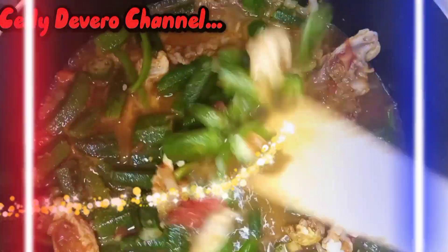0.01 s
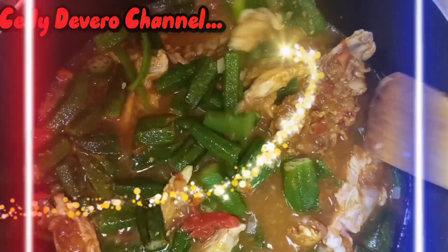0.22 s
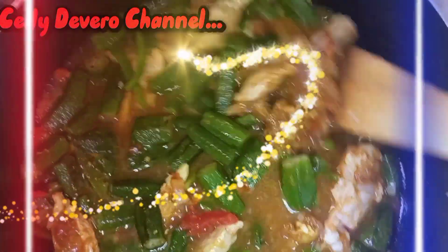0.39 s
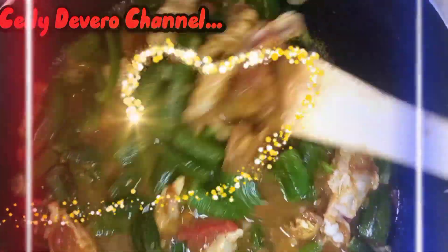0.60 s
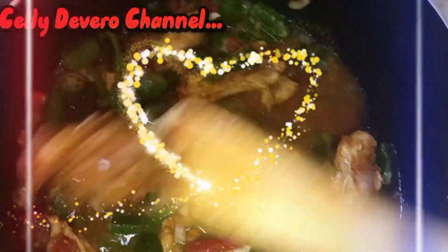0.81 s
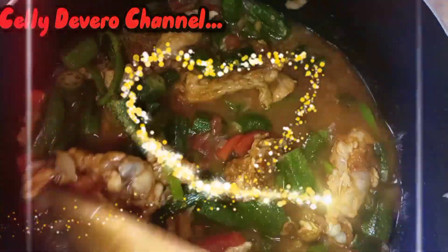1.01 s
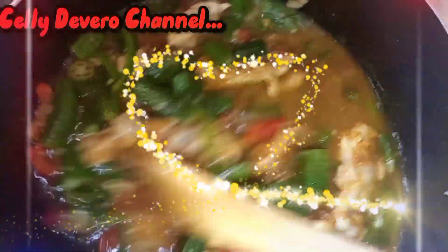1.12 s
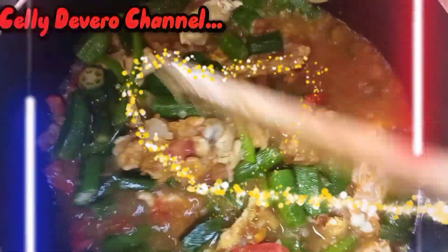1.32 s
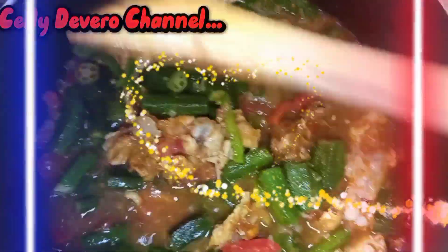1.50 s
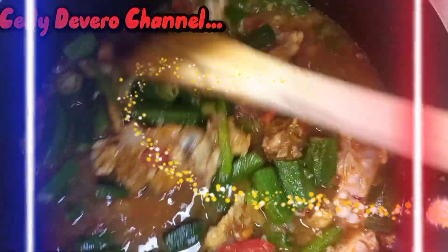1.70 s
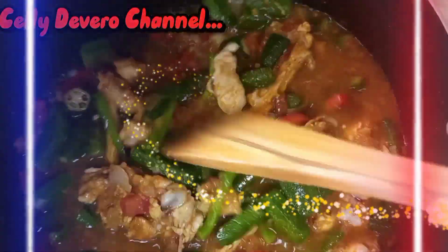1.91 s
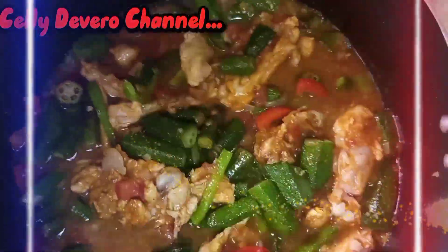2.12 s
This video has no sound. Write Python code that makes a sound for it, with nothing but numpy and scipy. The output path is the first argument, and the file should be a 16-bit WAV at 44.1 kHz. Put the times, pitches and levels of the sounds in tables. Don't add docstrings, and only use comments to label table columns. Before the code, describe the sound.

A wooden spatula knocks a metal pot of stew: a crisp clack at 0.2 seconds, a louder, hollow, damped knock at 0.28, and a faint tap near 0.66. Slight wet scrapes surround them. Quiet steam hiss, fizz and low gulps run throughout, strongest after 0.34, easing past 1 second. Bubbles tick sharply at 1.0 and 1.75. Faint motor hum, short room reflections, close dull phone microphone.

```python
import sys
import numpy as np
from scipy import signal
from scipy.fft import rfft, irfft, next_fast_len
from scipy.io import wavfile
from scipy.ndimage import uniform_filter1d, map_coordinates

SR = 44100
rng = np.random.default_rng(int(sys.argv[2]) if len(sys.argv) > 2 else 0)


def dump(signal):
    limited = np.clip(np.atleast_2d(signal).T, -1, 1)
    pcm = np.round(limited * 32767).astype(np.int16)
    wavfile.write(sys.argv[1], SR, pcm)


def volts_from_db(level):
    exponent = np.asarray(level, float) / 20
    return 10 ** exponent


N = 97020


def unit(x):
    return x / np.sqrt(np.mean(x ** 2) + 1e-20)


def along(points, hz):
    f, value = np.transpose(points)
    return np.interp(np.log(hz + 1), np.log(f + 1), value)


def wobble(rate):
    return map_coordinates(rng.standard_normal(200), [np.arange(N) * rate / SR])


def filtered(x, response):
    m = next_fast_len(len(x) + 8192)
    return irfft(rfft(x, m) * response(np.fft.rfftfreq(m, 1 / SR)), m)[:len(x)]


def peak(hz, width_hz):
    return lambda f: 1j * f * width_hz / (hz * hz - f * f + 1j * f * width_hz)


def band_noise(noise, hz, width_hz):
    return unit(filtered(noise, lambda f: peak(hz, width_hz)(f) ** 2))


def rush(response, patchy_db):
    z = signal.stft(rng.standard_normal(N), nperseg=512)[2]
    patches = uniform_filter1d(rng.standard_normal(z.shape), size=5, axis=0)
    patches = unit(uniform_filter1d(patches, size=6, axis=1))
    noise = signal.istft(z * volts_from_db(patchy_db * patches), nperseg=512)[1][:N]
    return unit(filtered(noise, response))


def swell(s, length_s):
    return np.exp(-8 * ((np.arange(N) / SR - s) / length_s) ** 2)


# f/Hz, level/dB, t60/s
POT = [(322, -8.5, 0.098), (389, -3, 0.042), (499.5, -10.5, 0.14), (732, 8, 0.029), (1084, -6, 0.1),
       (1644, 6, 0.0051), (1986, -10.5, 0.061), (2293, 0, 0.018), (2633, -4, 0.022), (3130, -4, 0.053),
       (4500, -3.5, 0.024), (5066, -25, 0.054), (5660, -7.5, 0.022), (6200, -5, 0.02)]
# f/Hz, level/dB, t60/s
WOOD = [(930, 2.5, .015), (1400, -19, 0.022), (1330, 5, 0.0064), (2480, -6, 0.0054), (3960, -6, 0.0066),
        (7300, 1, 0.015)]


def knock(s, db, hz, octaves, blow_db):
    crack_db, crack_t60_s, rise_s = 3, 0.003, 0.0008
    snap_db = 7.5
    blow_cycles = 0.31
    start = int(s * SR)
    t = np.maximum(np.arange(start, start + SR // 4) / SR - s, 0)

    ring = np.zeros(len(t))
    for f, level, t60 in [*POT, *WOOD]:
        favour = np.exp(-0.5 * (np.log2(f / hz) / octaves) ** 2)
        ring += favour * volts_from_db(level - 60 * t / t60) * np.sin(2 * np.pi * f * t)

    noise = rng.standard_normal(len(t))
    crack = band_noise(noise, hz, hz * octaves * 2)
    crack += volts_from_db(snap_db) * np.gradient(noise) * hz / 6000
    crack *= volts_from_db(crack_db - 60 * t / crack_t60_s)

    u = t * hz * octaves / blow_cycles
    blow = volts_from_db(blow_db) * u * np.exp(1 - u) * np.sin(2 * np.pi * hz * t)
    sound = volts_from_db(db) * (blow + (ring + crack) * (1 - np.exp(-t / rise_s)))
    sound = filtered(sound, lambda f: (1j * f / (1j * f + 193)) ** 3)
    return np.pad(sound, (start, N))[:N]


# t/s, level/dB, favoured f/Hz, spread/octaves, direct push over the ring level/dB
CONTACTS = [(.2029, -33, 2240, 0.25, 3), (0.2031, -33.5, 6200, 0.24, 9.5), (.2033, -52.5, 900, 0.42, 9),
            (.2043, -33.5, 2045, 0.18, 4), (0.2051, -36.5, 5600, 0.28, 9.5), (0.2833, -32, 707, 0.26, 0.5),
            (0.2831, -23, 379, 0.37, -7.5), (0.284, -37.5, 5800, 0.13, 8), (0.2838, -39.5, 2400, 0.54, 7),
            (0.2868, -22, 2340, 0.38, 11), (0.2865, -35.5, 1360, 0.6, 8), (0.2863, -29, 5900, 0.24, 6),
            (0.288, -24.5, 4640, 0.27, 4.5), (.2904, -34, 2500, 0.31, 13), (0.2944, -40, 4500, 0.38, 12),
            (0.6642, -42.5, 775, 0.42, 11), (0.6648, -50, 2170, .2, 5.5), (.6765, -56, 591, 0.27, 11.5)]


def knocks():
    return [knock(*contact) for contact in CONTACTS]


SCRAPE_S = [.19, .222, .53, .657, .71, 1.343, 1.749, 1.755, 2.127, .16, .97, 1.65, 1.94, 2.02]
# length/s, level/dB, centre f/Hz
SCRAPES = [(0.095, -59, 2930), (0.025, -56.5, 6600), (0.038, -67.5, 4900), (0.022, -57, 1530),
           (0.12, -65.5, 3900), (0.049, -63, 2600), (0.051, -59.5, 4100), (0.049, -62, 680),
           (0.019, -60.5, 5500), (0.041, -65.5, 340), (0.054, -65, 570), (0.047, -64.5, 350),
           (0.085, -67.5, 430), (0.038, -62, 2050)]


def scrapes():
    out = np.zeros(N)
    for s, (length_s, db, hz) in zip(SCRAPE_S, SCRAPES):
        grit_db = 3.5 * rng.standard_normal(N // 64 + 1).repeat(64)[:N]
        grit = rng.standard_normal(N) * volts_from_db(grit_db)
        out += volts_from_db(db) * swell(s, length_s) * band_noise(grit, hz, 0.9 * hz)
    return out


# t/s, peak level/dB, f/Hz, t60/s
TICKS = [(.1635, -45, 2820, 0.013), (.1635, -53, 5100, .01), (0.178, -52, 3300, .006),
         (0.221, -52, 5200, .006), (.224, -48.5, 1880, .012), (0.513, -60, 5200, 0.0034),
         (.529, -61, 7000, .004), (0.645, -50, 5050, 0.004), (0.773, -61, 7650, .007),
         (1.2184, -52, 2900, .006), (.8805, -51, 1740, 0.013), (0.9048, -41.5, 1520, 0.0048),
         (.919, -56, 7740, 0.0072), (1.0036, -47, 3600, 0.0038), (0.986, -57, 7060, .005),
         (1.0041, -35, 5060, 0.0027), (1.006, -56.5, 5540, 0.015), (1.004, -49, 7350, 0.0028),
         (1.032, -52, 4200, 0.0077), (1.0595, -54, 6050, 0.0064), (1.155, -62, 6500, 0.0037),
         (1.1703, -57, 2580, 0.017), (1.2184, -42.5, 3620, .004), (1.227, -62, 7400, 0.0063),
         (1.23, -49, 3240, 0.0063), (1.264, -51, 9600, .005), (1.3294, -57, 2100, 0.0052),
         (1.345, -57, 6400, .005), (1.358, -61, 7600, .007), (1.415, -58, 7040, 0.0038),
         (1.468, -52.5, 5660, .005), (1.494, -58.5, 3800, 0.0087), (1.7335, -48, 5560, 0.0034),
         (1.741, -54, 4830, .005), (1.7442, -42.5, 5470, .006), (1.7452, -45, 4530, .005),
         (1.7478, -49, 5000, .004), (1.748, -38, 4870, 0.0032), (1.746, -50.5, 10800, 0.039),
         (1.7513, -48, 2670, 0.005), (1.7577, -48, 2130, 0.0041), (1.761, -49, 1500, 0.0039),
         (1.812, -51.5, 5570, 0.005), (1.913, -53, 5900, 0.0048), (1.943, -66, 7800, .005),
         (2.0635, -54.5, 3280, 0.008), (2.1213, -49.5, 4600, 0.0059), (2.1272, -51, 4500, 0.0058),
         (2.131, -52, 6170, 0.0047), (2.193, -59, 3900, .007)]


def ticks():
    out = np.zeros(N + SR)
    t = np.arange(2048) / SR
    rise = 1 - np.exp(-t / 0.0003)
    for s, db, hz, t60 in TICKS:
        skirt = band_noise(rng.standard_normal(len(t)), hz, hz * 0.5)
        tone = np.sin(2 * np.pi * hz * t) + 0.3 * skirt
        out[round(s * SR):][:len(t)] += volts_from_db(db + 4 - 60 * t / t60) * rise * tone
    return out[:N]


# t/s, length/s, level/dB, f/Hz
GULPS = [(0.263, 0.069, -54, 123.4), (0.425, 0.19, -52, 116), (0.602, 0.056, -54.5, 120),
         (0.67, 0.077, -59, 122), (0.77, 0.035, -58, 122.3), (0.944, 0.15, -53.5, 114),
         (1.017, 0.038, -54.5, 131.5), (1.186, 0.066, -58.5, 123.5), (1.255, 0.024, -53, 135),
         (1.36, 0.038, -56.5, 126), (1.48, 0.17, -58.5, 115), (1.64, 0.07, -63, 110),
         (1.714, 0.018, -53.5, 127), (1.85, 0.073, -61, 122.4), (2.014, 0.095, -53.5, 115.6),
         (2.098, 0.075, -58, 133.5), (.01, 0.044, -61, 119), (0.083, 0.097, -65, 115.5),
         (.36, 0.5, -64, 61.1)]


def gulps():
    out = np.zeros(N)
    t = np.arange(N) / SR
    for s, length_s, db, hz in GULPS:
        level = volts_from_db(db - 1 + wobble(40))
        phase = 0.5 * wobble(29.86) + 2 * np.pi * rng.random()
        out += level * swell(s, length_s) * np.sin(2 * np.pi * hz * t + phase)
    return out


# f/Hz, level/dB per Hz
HISS = [(590, -17.5), (1000, -7), (1410, -10.5), (1800, -2), (2350, -5), (2880, -14.5), (3570, -11.5),
        (5970, -16), (8370, -27.5), (10900, -72), (18400, -120)]


def hiss(level_db):
    return volts_from_db(level_db + 1.48) * rush(lambda f: volts_from_db(along(HISS, f)), patchy_db=2.5)


# f/Hz, width/Hz, level/dB
SING = [(327, 45, -78.5), (529.4, 22, -76.5), (1950, 50, -87.5), (2090, 41, -75.5), (2344, 22, -75),
        (3000, 62, -87), (5200, 410, -76.5), (5930, 220, -78.5)]


def sing(lift_db):
    return sum(volts_from_db(db + lift_db) * rush(peak(hz, width_hz), patchy_db=4.5) for hz, width_hz, db in SING)


# f/Hz, level/dB per Hz
RUMBLE = [(15, -46), (25, -16), (59, -10.5), (118, 4.5), (266, -8), (524, -10), (649, -11), (818, -12),
          (1300, -58), (1690, -58), (2860, -120)]


def rumble(level_db):
    return volts_from_db(level_db - 66.5) * rush(lambda f: volts_from_db(along(RUMBLE, f)), patchy_db=1.5)


def fizz():
    per_s, level_db, spread_db = 150, -70, 2.5
    when, pitch, size = rng.random((3, 600))
    t = np.arange(128) / SR
    hz = 4500 * 2 ** (2 * pitch[:, None] - 1)
    level = volts_from_db(level_db - spread_db * np.log(size[:, None]))
    grains = level * np.exp(-t * hz / 2.1) * np.sin(2 * np.pi * hz * t)
    starts = (np.cumsum(2 * when / per_s) * SR).astype(int)
    at = starts[:, None] + np.arange(len(t))
    return np.bincount(at.ravel(), grains.ravel(), N)[:N]


# t/s, level/dB
STIR = [
    (0.0, -69.5),
    (0.16, -66.5),
    (0.34, -65.5),
    (1.02, -67.5),
    (1.41, -69),
    (1.77, -69),
    (2.2, -67.5),
]


def simmer():
    s, db = np.transpose(STIR)
    strength_db = np.interp(np.arange(N) / SR, s, db)
    lift_db = strength_db - strength_db.mean()
    flutter_db = 0.9 * wobble(14) + 0.8 * wobble(45)
    steam = hiss(strength_db + flutter_db)
    churn = rumble(0.41 * lift_db + flutter_db)
    return steam + sing(lift_db) + churn + volts_from_db(lift_db) * fizz()


def hum():
    phase = 2 * np.pi * 821 * np.arange(N) / SR + 0.27 * wobble(3.2)
    return volts_from_db(-76 + 0.59 * wobble(2.9)) * np.sin(phase)


# f/Hz, t60/s
KITCHEN = [(200, 0.34), (700, 0.22), (2200, 0.16), (5000, 0.26), (9000, 0.099)]


def kitchen(x):
    hz, t, z = signal.stft(rng.standard_normal(SR // 2), SR, nperseg=256)
    decay = volts_from_db(-60 * t / along(KITCHEN, hz)[:, None])
    tail = signal.istft(z * decay, SR, nperseg=256)[1]
    late = np.pad(x, (int(0.006 * SR), 0))
    return signal.fftconvolve(late, tail / np.linalg.norm(tail))[:N]


def scene():
    bed = simmer() + gulps() + hum()
    near = knocks() + [ticks(), scrapes()]
    room_db = -14
    return (sum(x + volts_from_db(room_db) * kitchen(x) for x in near) + bed)[None]


# f/Hz, level/dB
MIC = [(3000, -1), (3650, -5), (4300, -2), (7300, -4.5), (8100, -7.5), (9500, -25.5), (13000, -43),
       (15200, -26.5)]
# f/Hz, level/dB per Hz
PREAMP = [(8000, 4), (10000, 2), (13000, -2), (15300, 2.5)]


def microphone(x):
    heard = filtered(x, lambda f: volts_from_db(along(MIC, f)))
    noise = filtered(rng.standard_normal(N), lambda f: volts_from_db(along(PREAMP, f)))
    return heard + volts_from_db(-91.5) * noise


def low_pass(x):
    return signal.sosfilt(signal.butter(12, 15720, fs=SR, output="sos"), x)


def record(dry):
    mix = microphone(dry[0])[None]
    return low_pass(mix)


dry = scene()
out = record(dry)
dump(out)
```